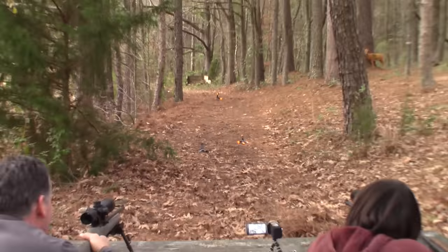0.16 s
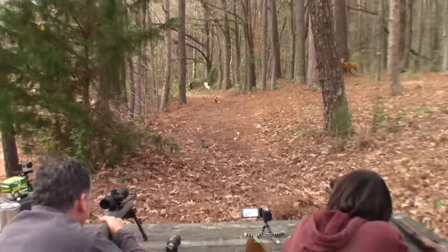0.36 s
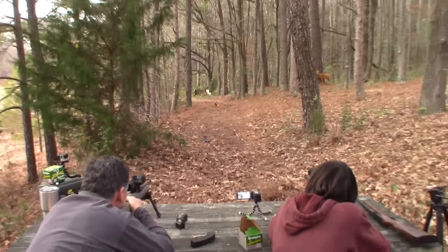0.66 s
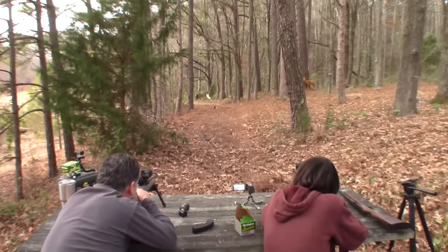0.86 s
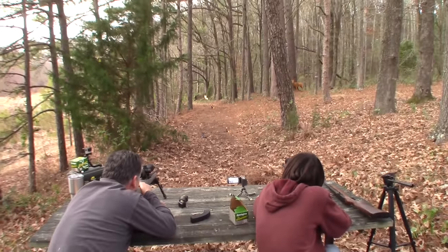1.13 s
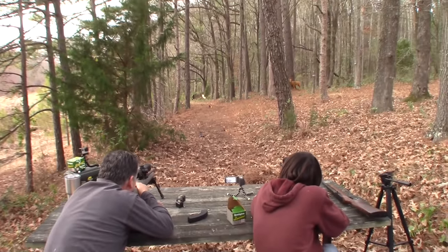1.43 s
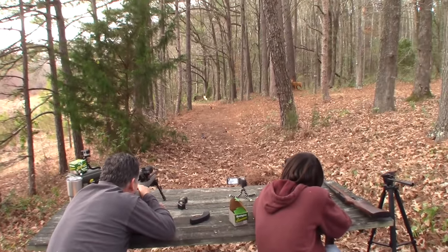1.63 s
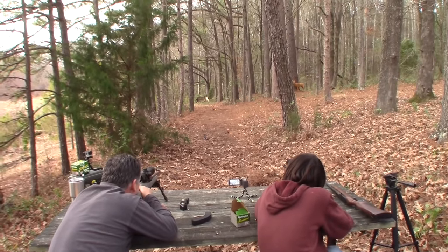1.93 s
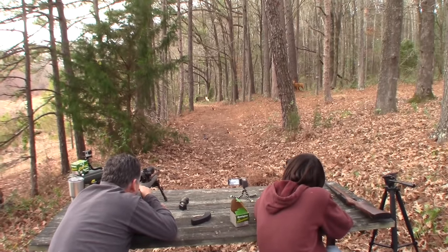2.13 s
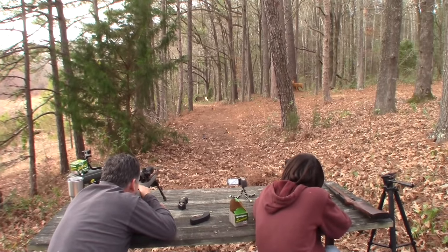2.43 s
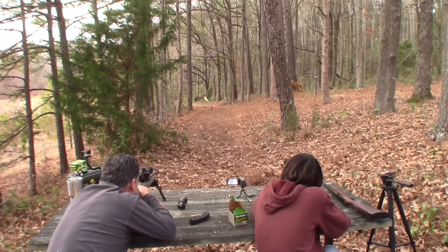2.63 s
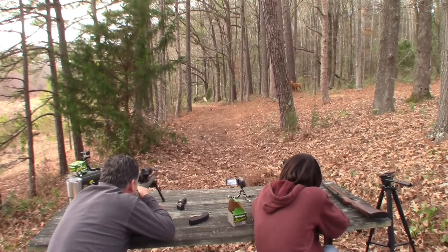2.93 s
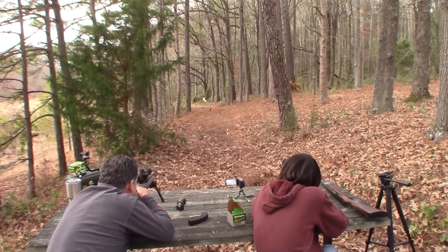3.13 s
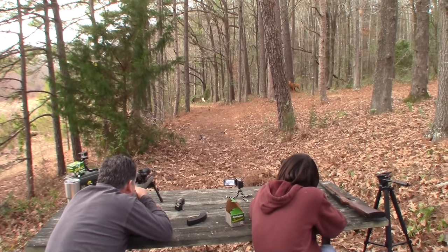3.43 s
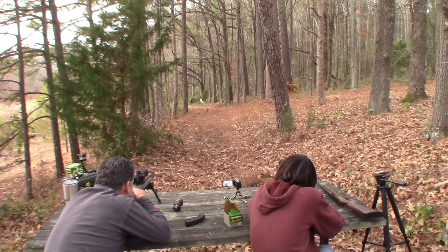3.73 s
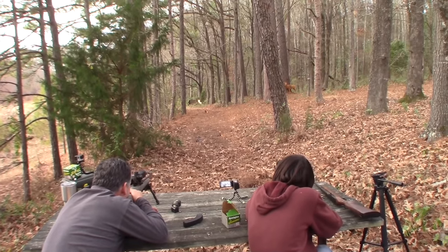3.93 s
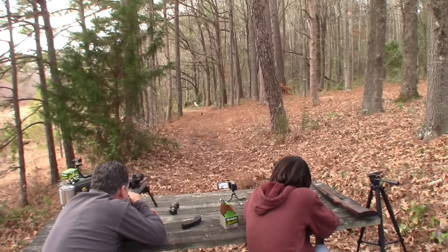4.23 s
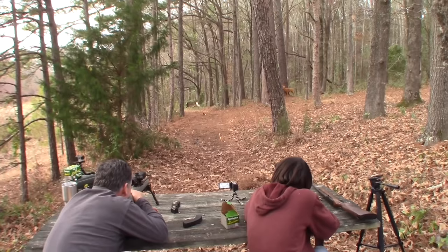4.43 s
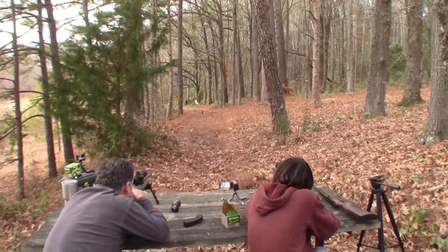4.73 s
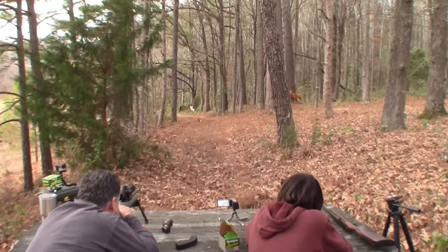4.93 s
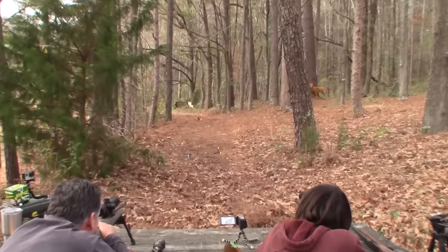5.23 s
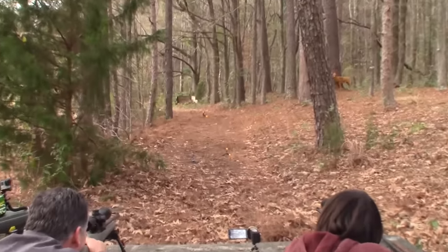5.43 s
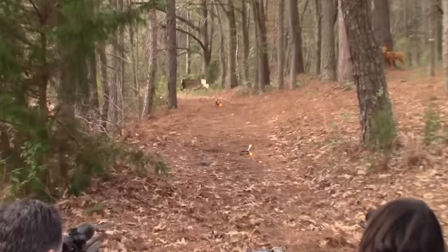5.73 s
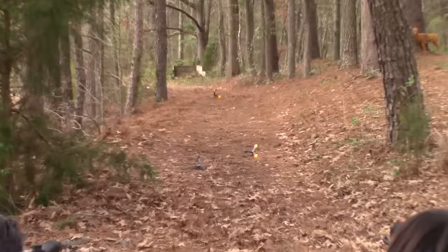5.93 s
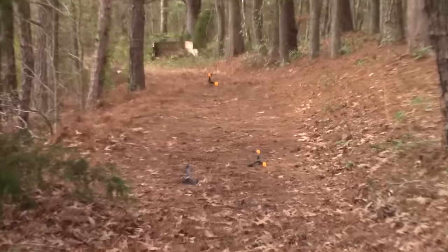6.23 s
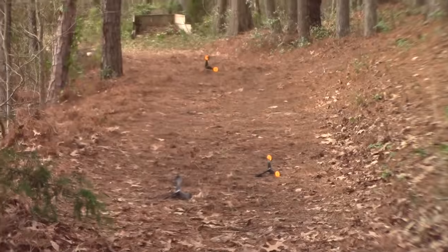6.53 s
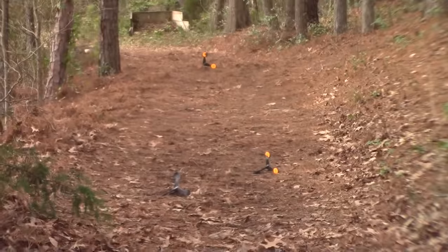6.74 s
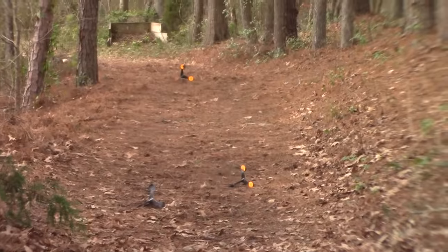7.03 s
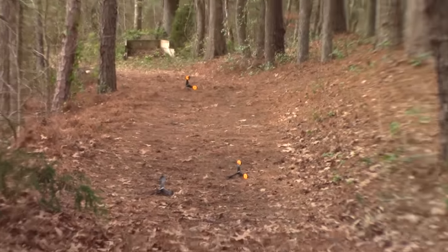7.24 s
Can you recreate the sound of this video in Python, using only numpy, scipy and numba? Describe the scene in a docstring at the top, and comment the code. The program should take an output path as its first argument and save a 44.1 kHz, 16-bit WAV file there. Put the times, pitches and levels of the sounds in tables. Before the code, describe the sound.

Two small-calibre rifles fire close to the microphone in quiet woods. Each shot is a sharp crack with a short thump, followed by a loud scatter of echoes from the trees that fades over about a second. Shots come at 0.3, 1.4 and 2.4 seconds, then at 2.8, slightly deeper, and 3.1. A quick run follows at 4.3, 4.5, 4.8, 5.1, 5.4 and 5.7, with two last shots at 6.4 and 7.0. Just after every shot except those at 4.5, 4.8 and 5.4, a steel target gives a bright, high ping that rings for about half a second, varying in pitch. Spent cases rustle softly into dry leaves around 1.1, 1.8 and 3.7 seconds. Gun actions click lightly, most clearly at 4.2. A small bird gives very faint, thin rising chirps near 1.3, 3.7 and 4.0, over a low hush of air.

```python
"""Two small-calibre rifles, close to the microphone, fire from a wooden bench in leaf-covered woods.
Each blast scatters off the leaves and comes back from the trunks. Down the lane, most bullets ring a
steel spinner paddle; by the bench, actions click and spent cases drop into the leaves. A small bird
calls faintly among the trees. The camera's microphone is a closely spaced stereo pair, and its limiter
holds blast and echoes at one level until the woods die away."""
import sys
import numpy as np
from scipy import signal
from scipy.fft import rfft, irfft
from scipy.io import wavfile
from numba import njit

SR = 44100
rng = np.random.default_rng(int(sys.argv[2]) if len(sys.argv) > 2 else 0)


def output_pcm(signal):
    """Save a mono or channel-first signal as 16-bit PCM at the path in sys.argv[1].

    Samples are clipped to [-1, 1] before scaling.
    """
    pcm = np.clip(np.atleast_2d(signal).T, -1, 1) * 32767
    wavfile.write(sys.argv[1], SR, np.round(pcm).astype(np.int16))


N = 325017
AGE = np.arange(int(2.2 * SR)) / SR  # time since a sound began, t/s

# shots; only the first one's tail is heard: t/s, report, echo level/dB, echo edge near 3 kHz/dB
SHOTS = [(-.75, "dull", -2, -3), (.3372, "dull", 0, 2), (1.3844, "dull", -2, -11),
         (2.4035, "dull", -1.5, -5), (2.8090, "deep", -2.5, -1), (3.1029, "dull", -3.5, -9),
         (4.2718, "dull", 0, -1), (4.5262, "dull", 0, -5), (4.7557, "dull", 0, -1),
         (5.0712, "sharp", -1, -5), (5.3665, "dull", 0, -1), (5.7405, "dull", 0, -2),
         (6.3835, "sharp", 1.5, 3), (6.9542, "dull", 1, -2)]
# muzzle reports by kind: crack level/dB, crack decay/s, thump level/dB, thump low cut f/Hz
REPORTS = {"dull": (2, .0012, .3, 200), "sharp": (4, .0028, 0, 190), "deep": (3.5, .003, 1.5, 105)}
# the blast's three quick pulses, 3 ms apart: delay t/s, level/dB
BLAST_PULSES = [(.0011, 0), (.0041, -1), (.0072, -1)]
# big trunks along the lane, each a distinct slap: round trip t/s, level/dB
BIG_TRUNKS = [(.019, 2), (.0405, 0), (.051, 5), (.0865, 1.5), (.133, 3), (.158, 1.5), (.187, 1), (.243, 0),
              (.274, -1.5)]
# bullets striking steel: t/s, paddle, level/dB, tilt/(dB per octave), f/Hz the struck spot favours
HITS = [(.3988, "far large", -1.5, -2, 8300), (1.4490, "far small", -3, 0, 6300),
        (2.4680, "far small", -5, 0, 6300), (2.8635, "near small", 0, .7, 12500),
        (3.1680, "far large", -.5, -.5, 10300), (4.3350, "far large", -2, -1, 7850),
        (5.1290, "near large", 0, 0, 8100), (5.8046, "far large", -3, -1, 9800),
        (6.4440, "middle", -.5, -.5, 14000), (7.0190, "far large", -5.5, -2.5, 9000)]
# modes of each steel paddle: f/Hz, level/dB, t60/s
PADDLE_MODES = { "far large": [(2236, -5, .68), (3876, -11, .62), (5636, -13, .47), (5945, -15, .55),
                (7752, -9, .4), (7926, -5, .42), (8166, -17, .4), (9280, -7, .35), (9430, -15, .45),
                (11108, -14, .36), (11610, -19, .38), (12000, -23, .28), (13220, -18, .33),
                (14450, -28, .27)], "far small": [(3704, -16, 1.1), (5925, -8, .5), (5950, -6, .55),
                (7117, -17, .55), (7757, -12, .33), (7930, -15, .38), (8296, -23, .42), (10680, -19, .33),
                (13230, -26, .33)], "near small": [(2067, -8, .6), (2299, -6, .8), (5696, -18, .5),
                (6029, 0, .55), (7843, -17, .45), (8053, -11, .5), (8306, -8, .55), (9448, -10, .45),
                (10960, -9, .42), (11860, -16, .4), (12240, -16, .45), (13430, -13, .45), (14740, -20, .4)],
                "near large": [(2280, -6, .7), (3946, -16, .5), (5696, -13, .55), (5959, -12, .55),
                (7843, -4, .5), (8064, -4, .52), (9426, -4, .4), (9593, -9, .38), (10850, -6, .36),
                (11290, -21, .35), (11700, -19, .35), (11840, -9, .35), (13430, -17, .38), (13590, -12, .4),
                (14800, -22, .35)], "middle": [(2300, -11, .6), (8064, -4, .55), (8250, -14, .45),
                (9593, -22, .35), (13590, -19, .45), (14750, -23, .35)]}
# spent cases landing in dry leaves: t/s, level/dB
CASES = [(1.050, -34), (1.841, -35), (3.568, -39), (3.763, -31)]
# clicks of trigger and action: t/s, level/dB
CLICKS = [(.9508, -46), (1.2482, -50), (2.1541, -35), (4.1850, -22), (4.2010, -38), (4.2170, -40)]
# thin rising calls of a small bird: t/s, level/dB
CHIRPS = [(1.333, -56), (3.700, -57), (3.955, -57)]
# noise spectra: f/Hz, level/dB
CRACK_COLOUR = [(60, -14), (250, 0), (650, 5), (900, -2), (1400, 4), (2500, 0), (5000, -1), (9000, -2),
                (16000, -8)]  # muzzle crack
SCATTER_COLOUR = [(40, -36), (120, -22), (220, -18), (400, -11), (550, -10), (800, -3), (1250, 0),
                  (1600, -3), (2100, 3.3), (2600, -2.5), (4000, -3.5), (8000, -4.5), (12000, -9.5),
                  (16000, -20)]  # scatter from the undergrowth
TRUNK_COLOUR = [(60, -42), (200, -25), (500, -15), (850, -3), (1300, 0), (1600, -3), (2100, 3), (3000, -4),
                (5000, -15), (9000, -27), (16000, -48)]  # slap off a trunk
SMACK_COLOUR = [(300, -22), (2000, -8), (3500, 0), (8000, 0), (11000, -11), (16000, -24)]  # bullet on steel
LEAF_COLOUR = [(300, -20), (2000, -6), (5000, -2), (9000, 0), (12000, -4), (16000, -13)]  # dry leaves, also the clicks
AIR_COLOUR = [(30, -11), (120, -5), (500, -2), (1500, -8), (4000, -18), (8000, -21), (16000, -34)]  # air of the woods


def rifles(vary_db=1.2, lead_s=.0022):
    """At the bench: a snap, the blast, then the undergrowth and the same trunks answering every shot."""
    out = np.zeros((2, N))
    stand = trunks()
    slaps = [burst(TRUNK_COLOUR, decay_s=.0035, side_db=-20) for _ in stand]
    edge_band = signal.butter(1, [2600, 3900], "band", fs=SR, output="sos")
    for (s, report, echo_db, edge_db), woods in zip(SHOTS, scatter()):
        add(out, s - lead_s, undb(-7) * burst(SCATTER_COLOUR, decay_s=.0012, side_db=-16))
        add(out, s, blast(*REPORTS[report]))
        for (delay, db), slap in zip(stand, slaps):
            add(woods, delay, undb(db + vary_db * rng.standard_normal()) * slap)
        # no two cartridges sound alike, and the woods return each one's colour
        edge = (undb(edge_db) - 1) * signal.sosfilt(edge_band, woods)
        add(out, s, undb(echo_db) * (woods + edge))
    return out


def blast(crack_db, crack_decay_s, thump_db, low_hz,
          push_s=.00019, boom_hz=225, glide_hz=130, glide_s=.012, boom_s=.009, knock_hz=655):
    """Close up: a crack and three quick pressure pulses, with a boom and a hollow knock."""
    crack = undb(crack_db + 10) * burst(CRACK_COLOUR, crack_decay_s, side_db=-13)
    for delay, db in BLAST_PULSES:
        add(crack, delay, undb(db + 3) * burst(CRACK_COLOUR, decay_s=.002, side_db=-13))
    t = AGE[:crack.shape[1]]
    push = sum(undb(db) * np.exp(-((t - delay) / push_s) ** 2 / 2) for delay, db in BLAST_PULSES)
    thump = signal.sosfilt(signal.butter(4, low_hz, "high", fs=SR, output="sos"), push)
    sagging_hz = boom_hz + glide_hz * np.exp(-t / glide_s)
    boom = np.sin(2 * np.pi * np.cumsum(sagging_hz) / SR) * np.exp(-t / boom_s)
    knock = np.cos(2 * np.pi * knock_hz * (t - BLAST_PULSES[0][0])) * np.exp(-t / .004)
    swell = 1 - np.exp(-t / .003)
    body = undb(15.5) * thump + (undb(6) * boom + undb(8) * knock) * swell
    return crack + undb(thump_db) * body


def trunks(count=18, nearest_s=.11, farthest_s=.31, tree_db=-3.5, fade_db_per_s=11, girth_db=1.1):
    """Round trip and level of each echo: the big trunks, then smaller trees, fainter with distance."""
    place = (np.arange(count) + rng.random(count)) / count
    delay = nearest_s + (farthest_s - nearest_s) * place
    db = tree_db - fade_db_per_s * delay + girth_db * rng.standard_normal(count)
    return BIG_TRUNKS + list(zip(delay, db))


def scatter(patchy_db=1.4, absorb_db_per_s=4.2):
    """The undergrowth's answer to each shot: patchy noise that loses its treble with distance."""
    span = 2 ** 17
    hz = np.fft.rfftfreq(span, 1 / SR)
    shape = gains(SCATTER_COLOUR, hz)
    spectrum = rfft(rng.standard_normal(span)) * shape / np.sqrt(np.mean(shape ** 2))
    edges = np.r_[0, np.geomspace(900, 17000, 13)]
    bands = np.float32([irfft(spectrum * (hz >= lo) * (hz < hi)) for lo, hi in zip(edges, edges[1:])])
    centre_khz = (edges[1:] + edges[:-1]) / 2000
    absorbed_db = absorb_db_per_s * centre_khz[:, None] ** 1.3 * AGE  # the rate is given at 1 kHz
    fade = np.float32(undergrowth(AGE) * undb(-absorbed_db))
    knots = np.arange(0, AGE[-1], .004)
    for shifts in rng.integers(0, span - len(AGE), (len(SHOTS), 2)):
        mid, side = ((bands[:, k:k + len(AGE)] * fade).sum(axis=0) for k in shifts)
        yield spread(mid, side, side_db=-18) * flicker(AGE, knots, patchy_db)


def undergrowth(t, leaves_db_per_s=150, thicket_s=.215, thicket_width=.43, linger_db_per_s=12):
    """Scatter strength: leaves by the bench die fast, the thicket swells, repeated scatter lingers."""
    leaves = undb(-2.5 - leaves_db_per_s * t)
    log_time = np.log((t + 1 / SR) / thicket_s)  # the swell rises faster than it falls
    thicket = undb(-8.5) * np.exp(-(log_time / thicket_width) ** 2 / 2)
    linger = undb(-11.5 - linger_db_per_s * t)
    return np.sqrt(leaves ** 2 + thicket ** 2 + linger ** 2)


def targets(spot_db=1, favour_db=4.5, waver_db=2.5, bloom_hz=1900, bloom_s=.07):
    """Down the lane: a bullet rings a paddle; echoes make each mode waver and let the low ones swell."""
    out = np.zeros((2, N))
    t = AGE[:SR]
    knots = np.arange(0, 1, .03)
    for s, paddle, db, tilt_db, spot_hz in HITS:
        add(out, s, undb(db + 10.5) * burst(SMACK_COLOUR, decay_s=.001, side_db=-16))
        for hz, mode_db, t60 in PADDLE_MODES[paddle]:
            ring_db = db - 4 + mode_db + tilt_db * np.log2(hz / 6000) + spot_db * rng.standard_normal()
            ring_db += favour_db * np.exp(-((hz - spot_hz) / 900) ** 2)
            waver = flicker(t, knots, waver_db)
            bloom = 1 + bloom_hz / hz * (1 - np.exp(-t / bloom_s))
            tone = np.sin(2 * np.pi * (hz * t + rng.random()))
            ring = undb(ring_db - 60 * t / t60) * waver * bloom * tone
            add(out, s, spread(ring, ring * rng.standard_normal(), side_db=-18))
    return out


def cases_and_actions(crackle_db=4):
    """By the bench: spent cases crackle into dry leaves; triggers and actions click."""
    out = np.zeros((2, N))
    for s, db in CASES:
        rustle = burst(LEAF_COLOUR, decay_s=.019, side_db=-12)
        grains = np.repeat(rng.standard_normal(128), 64)
        onset = 1 - np.exp(-AGE[:len(grains)] / .004)
        add(out, s, undb(db + crackle_db * grains) * rustle * onset)
    for s, db in CLICKS:
        add(out, s, undb(db) * burst(LEAF_COLOUR, decay_s=.003, side_db=-12))
    return out


def bird(start_hz=6700, rise_hz=1100, length_s=.035):
    """Off among the trees: a small bird's faint upward slurs."""
    out = np.zeros(N)
    progress = np.linspace(0, 1, int(length_s * SR))
    hz = start_hz + rise_hz * np.sin(np.pi / 2 * progress)
    slur = np.sin(np.pi * progress) * np.sin(2 * np.pi * np.cumsum(hz) / SR)
    for s, db in CHIRPS:
        add(out, s, undb(db) * slur)
    return out


def air():
    """All around: the steady low hush of the woods."""
    shape = gains(AIR_COLOUR, np.fft.rfftfreq(N, 1 / SR))
    mid, side = irfft(rfft(rng.standard_normal((2, N))) * shape, N)
    return spread(mid / mid.std(), side / side.std(), side_db=-10)


def burst(colour, decay_s, side_db):
    """A sudden puff of coloured noise that dies away."""
    t = AGE[:8192]
    shape = gains(colour, np.fft.rfftfreq(len(t), 1 / SR))
    cepstrum = irfft(np.log(shape / np.sqrt(np.mean(shape ** 2))))
    cepstrum[1:] *= 2 * (t[1:] < t[-1] / 2)  # a causal filter keeps the onset sharp
    puffs = rng.standard_normal((2, len(t))) * np.exp(-t / decay_s)
    mid, side = irfft(rfft(puffs) * np.exp(rfft(cepstrum)))
    return spread(mid, side, side_db)


def spread(mid, side, side_db):
    """Left and right of two closely spaced microphones."""
    return mid + undb(side_db) * side * np.array([[1], [-1]])


def flicker(t, knots, depth_db):
    """A gain that wanders to a new random level at each knot in time."""
    return np.interp(t, knots, undb(depth_db * rng.standard_normal(len(knots))))


def gains(colour, hz):
    """Read a spectrum on a log-frequency axis."""
    points, db = np.transpose(colour)
    return undb(np.interp(np.log(hz + 1), np.log(points), db))


def undb(db):
    """Decibels to gain."""
    return 10 ** (np.asarray(db) / 20)


def add(out, s, sound):
    """Mix a sound in at time s."""
    i = int(round(s * SR))
    lo, hi = max(i, 0), min(i + sound.shape[-1], out.shape[-1])
    if hi > lo:
        out[..., lo:hi] += sound[..., lo - i:hi - i]


def scene():
    """What reaches the microphone: shots, steel and small sounds over the faint air of the woods."""
    hush = undb(-51) * air()
    return rifles() + targets() + cases_and_actions() + bird() + hush


@njit
def follow(level, attack, release):
    """The limiter's peak follower rises fast and falls slowly."""
    out, peak = np.empty(len(level)), 0.
    for i in range(len(level)):
        peak += (level[i] - peak) * (attack if level[i] > peak else release)
        out[i] = peak
    return out


def record(dry, attack_s=.00035, release_s=.027, ceiling_db=-3.4, top_hz=16000):
    """The camera's limiter ducks under each blast; what slips past it clips, and the top is cut."""
    attack, release = (1 - np.exp(-1 / (s * SR)) for s in (attack_s, release_s))
    peak = follow(np.abs(dry).max(axis=0), attack, release)
    reduction = np.maximum(peak / undb(ceiling_db), 1)
    held = np.clip(dry / reduction, -1, 1)
    return signal.sosfilt(signal.ellip(8, .2, 60, top_hz, fs=SR, output="sos"), held)


dry = scene()
out = record(dry)
output_pcm(out)
```